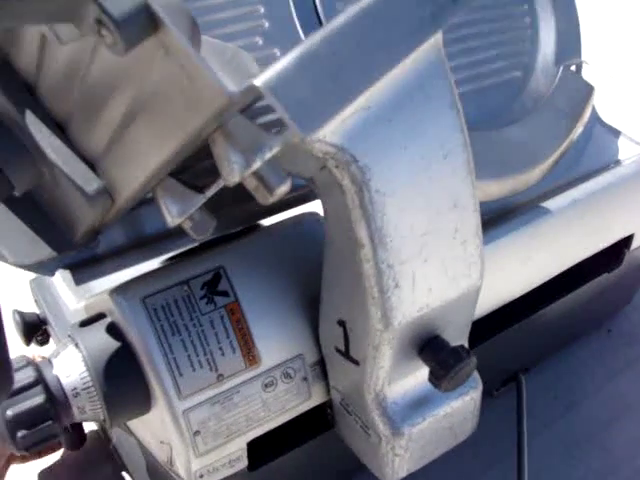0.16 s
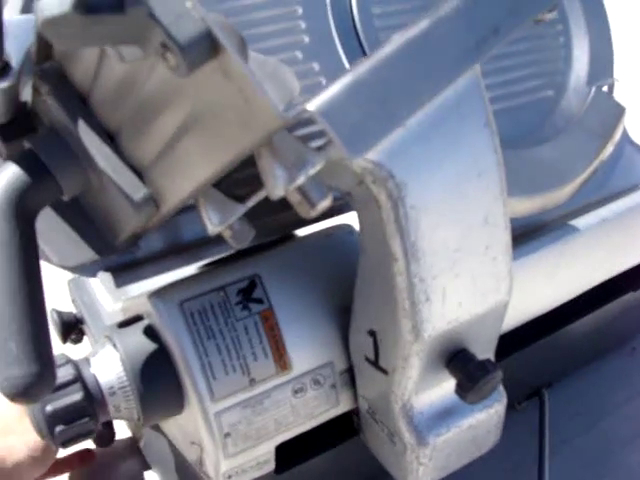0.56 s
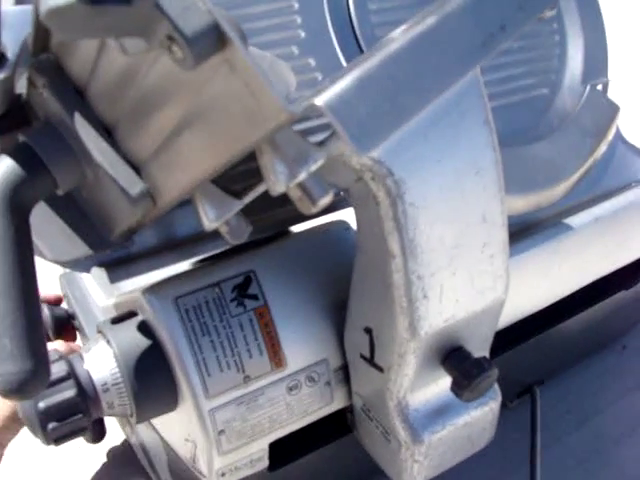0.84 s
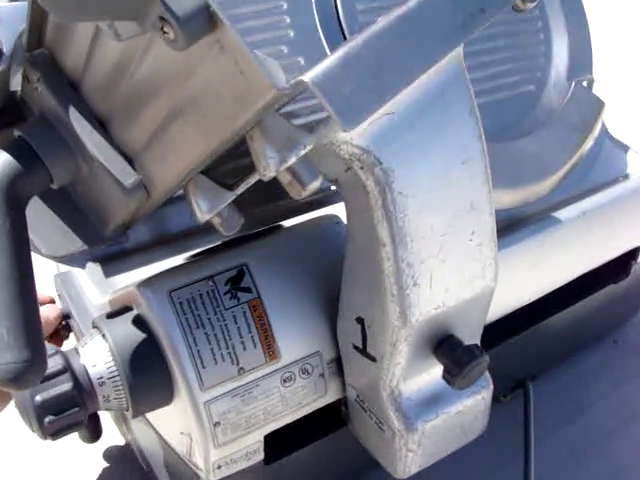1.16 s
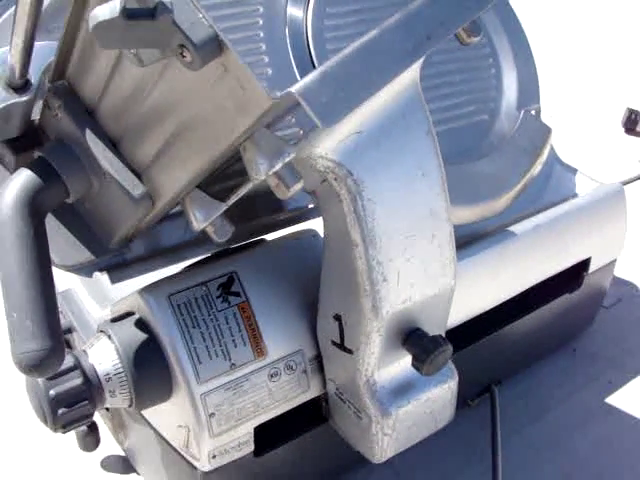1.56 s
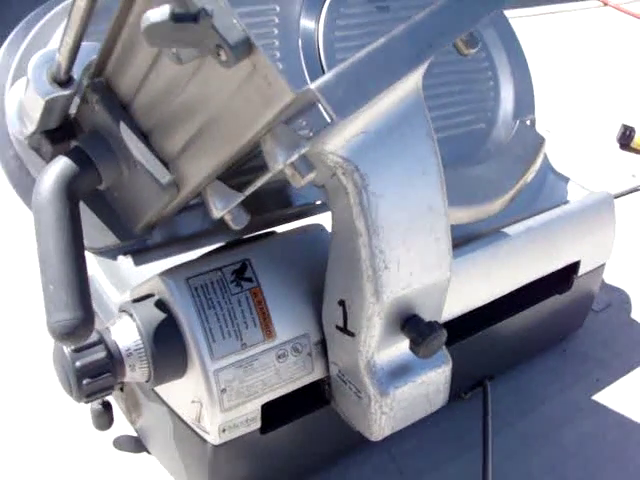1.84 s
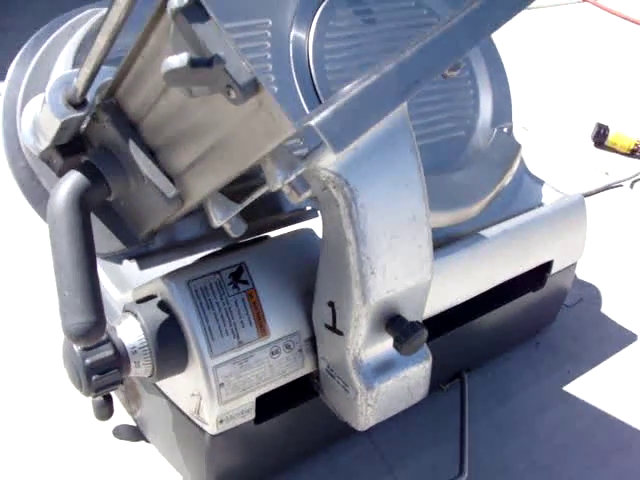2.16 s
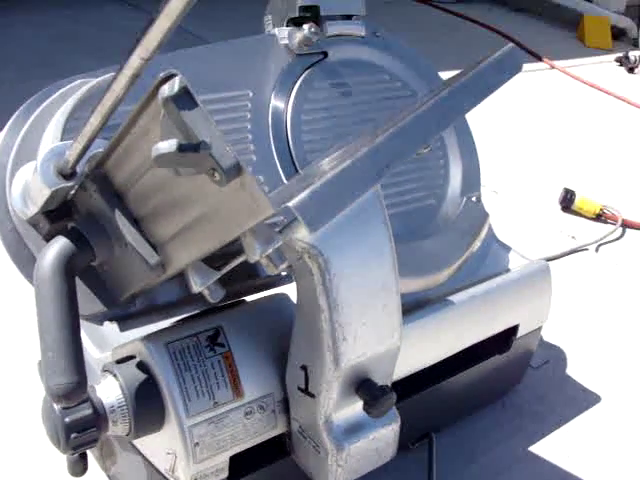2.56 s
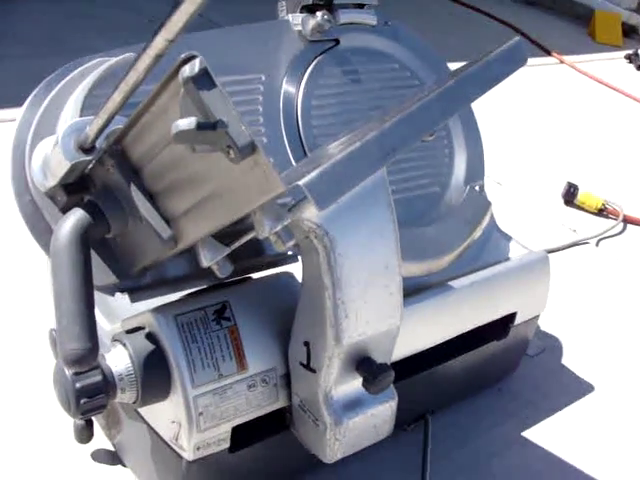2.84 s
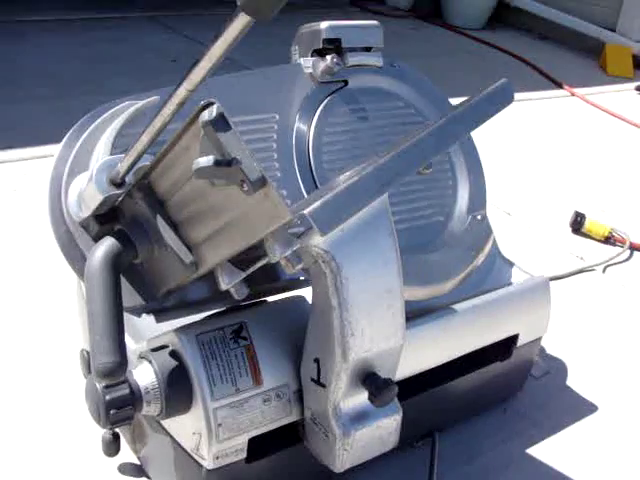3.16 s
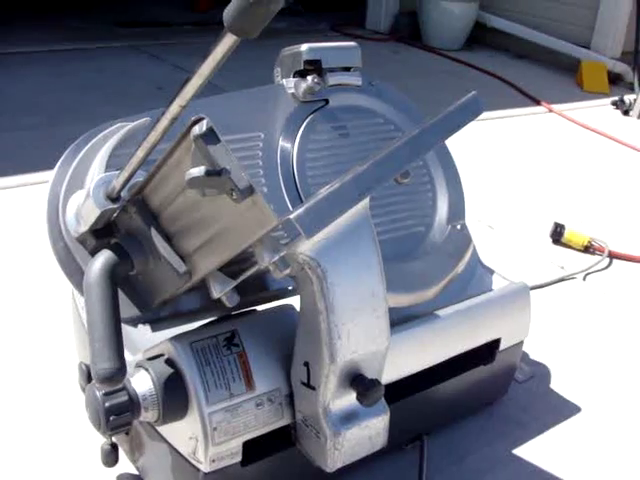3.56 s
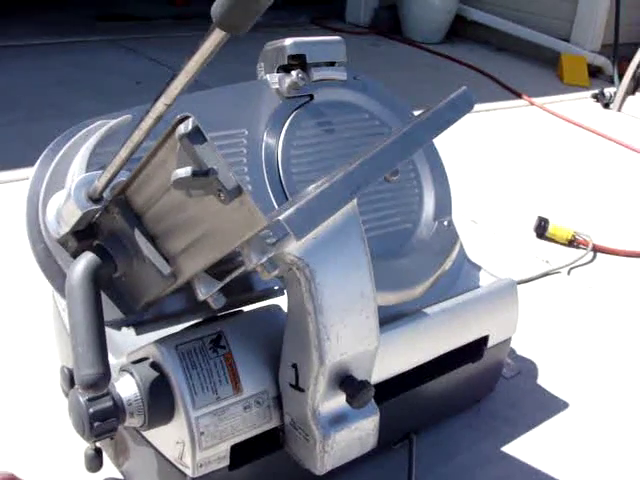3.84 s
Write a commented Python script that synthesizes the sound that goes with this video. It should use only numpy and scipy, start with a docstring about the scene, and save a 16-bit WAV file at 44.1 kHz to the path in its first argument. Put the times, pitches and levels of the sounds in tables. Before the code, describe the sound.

Close up in an open yard, fingers tap and rub a switch, a motor rattles into life and runs with hum, whir and regular gritty scrapes; a shoe scuffs paving midway, birds chirp at the end.

```python
"""A small electric slicer outdoors: air hushes as shaped noise, far birds chirp as gliding sines with a diffuse echo.
Fingers tap, bump and rub the switch, as decaying noise, low sines and noise bands; thin hisses come later.
The contact snaps, the motor clatters on through noise and ringing modes and settles to a mains hum, whines and whir;
then once a turn a stiff spot in the drive grinds, as grains that excite the housing's resonances.
Meanwhile a shoe scuffs the paving, as rough noise with rasping bands; near the end the birds chirp again."""
import sys
import numpy as np
from scipy import signal
from scipy.fft import rfft, irfft, next_fast_len
from scipy.io import wavfile
from scipy.ndimage import uniform_filter1d, map_coordinates

SR = 44100
rng = np.random.default_rng(int(sys.argv[2]) if len(sys.argv) > 2 else 0)


def linear_from_db(decibels):
    """Turn decibels (scalar or array-like) into linear amplitude factors; 0 gives 1."""
    return 10 ** (np.asarray(decibels, float) / 20)


def digitize_waveform(pressure):
    """Quantize a signal to 16-bit integers and store it at the path in sys.argv[1].

    Rows of a 2-D input are taken as channels; values are limited to [-1, 1].
    """
    field = np.atleast_2d(pressure).T
    bounded = np.clip(field, -1, 1)
    quanta = np.round(bounded * 32767).astype(np.int16)
    wavfile.write(sys.argv[1], SR, quanta)


N = 176400
T = np.arange(N) / SR  # seconds

# Spectrum of the outdoor hush. Each row: frequency in Hz, relative density in dB per Hz.
AIR_SPECTRUM = [(28, -11), (48, 0.5), (146, -0.5), (395, -7), (641, -1.5), (990, -12.5), (1210, -6),
                (1920, -6.5), (2680, -12.5), (3380, -11), (4140, -20.5), (5350, -16.5), (9870, -25),
                (12800, -54.5)]
AIR_DB = -45.5

# Gliding bird chirps. Each row: start in seconds, length in seconds, start pitch in Hz, end pitch in Hz,
# starting level in dB, hoarseness (scale of the random pitch deviation) in Hz.
CHIRPS = [(0.02, 0.025, 6000, 5660, -42, 100), (0.025, 0.063, 3330, 3480, -46, 131),
          (0.103, 0.031, 4930, 3600, -42, 100), (0.146, 0.05, 4930, 3320, -46.5, 180),
          (0.276, 0.12, 4880, 2240, -46.5, 130), (0.524, 0.03, 4460, 4870, -45.5, 298),
          (0.554, 0.093, 4040, 3380, -42, 200), (0.573, 0.079, 3160, 2980, -47, 120),
          (.675, 0.034, 2235, 2130, -46.5, 60), (3.808, 0.032, 4720, 4520, -43.5, 129.5),
          (3.806, 0.081, 4380, 4250, -42, 129.5), (3.85, 0.033, 3420, 3280, -33.5, 110)]
CHIRP_FADE_DB, CHIRP_ROUGH_DB = 3, 3.5  # fade along a chirp; scale of its random level
CHIRP_BEND = 0.8  # exponent; under 1 the glide flattens out
YARD_T60_S, YARD_DB = 0.4, -2.5  # decay and level of the yard echo

# Finger taps. Each row: start in seconds, level in dB before a common trim, 60 dB decay in seconds,
# treble relative to body in dB.
TAPS = [(0.74, -28, 0.063, -20), (0.893, -18.5, 0.095, -22), (0.978, -27, 0.057, -5.5)]
# Resonances of the switch plate. Each row: frequency in Hz, width in Hz, relative level in dB.
PLATE_MODES = [(866, 44, -1), (1490, 18, 4), (1990, 110, -7), (2840, 170, -8.5), (3420, 89, -1.5),
               (5900, 39, -13.5), (6400, 110, -12)]
# Soft low bumps. Each row: centre in seconds, frequency in Hz, length in seconds, level in dB before a common lift.
BUMPS = [(0.808, 62, 0.036, -39), (1.17, 353, 0.035, -48)]
# Finger rubs. Each row: start in seconds, rise in seconds, fall in seconds, level in dB, centre frequency in Hz.
RUBS = [(1.02, 0.026, 0.099, -41.5, 1580), (1.17, 0.011, .02, -45, 2900), (1.55, 0.036, 0.066, -34, 2000),
        (1.508, .004, .015, -40.5, 2200), (1.3, 0.0028, .016, -28, 1800)]
# Thin hisses. Each row: centre in seconds, length in seconds, level in dB.
HISSES = [(1.66, 0.085, -39), (1.805, 0.024, -36), (1.926, 0.038, -36.5), (2.668, 0.024, -41),
          (2.785, 0.04, -40), (2.925, 0.018, -40.5), (3.482, 0.027, -41)]
HISS_HZ, HISS_WIDTH_HZ = 6600, 3000

SNAP_S, SNAP_DB, SNAP_T60_S = 1.246, -18, 0.0062  # the contact snaps shut
# Course of the start-up rattle. Each row: time in seconds, treble level in dB, body level in dB.
CLATTER = [(1.243, -49.5, -46), (1.244, -18.5, -26), (1.246, -7.5, -19), (1.27, -18, -14),
           (1.281, -15, -17), (1.285, -18.5, -18), (1.287, -14.5, -8.5), (1.294, -26, -22.5),
           (1.32, -26, -18.5), (1.359, -25.5, -25.5), (1.385, -35, -29), (1.415, -43, -33),
           (1.435, -33, -42), (1.443, -35.5, -44), (1.452, -56.5, -50)]
# Spectrum of the rattle's body. Each row: frequency in Hz, relative density in dB per Hz.
CLATTER_BODY = [(120, -45), (200, -7.5), (921, -4.5), (1010, -8.5), (1180, -5), (1750, -3), (2540, -12.5),
                (2930, -1.5), (4300, -28), (5590, -34), (9460, -120)]
# Spectrum of the rattle's treble. Each row: frequency in Hz, relative density in dB per Hz.
CLATTER_TREBLE = [(2180, -14), (3700, -4.5), (4680, -12), (6210, -8), (7220, -7), (7940, -7), (9870, -17.5),
                  (12800, -55)]
# Housing modes shaken in turn. Each row: start in seconds, length in seconds, frequency in Hz,
# level in dB before a common lift.
SHAKES = [(1.254, 0.013, 1760, -21), (1.257, 0.032, 1010, -12), (1.277, 0.015, 2980, -11.5),
          (1.311, 0.037, 1800, -23), (1.338, 0.039, 785, -15.5), (1.358, 0.034, 974, -23),
          (1.356, .13, 137, -15), (1.381, 0.081, 230, -26)]

ON_S, HUM_RISE_S = 1.243, 0.09  # motor onset and rise
HUM_HZ, HUM_LAG_RAD = 120.01, 2.25
# Partials of the mains hum. Each row: multiple of the hum frequency, level in dB before a common lift.
HUM = [(1, -32), (2, -29), (3, -33)]
LOAD_DB = 1.5  # the hum swells as the stiff spot loads the motor
# Faint narrow whines. Each row: frequency in Hz, width in Hz, rms level in dB.
WHINES = [(145.5, 13, -48.5), (502, 17, -45.5), (603, 2.05, -42), (807, 60, -45.5), (843, 17, -44.5),
          (1664, 1.3, -47.5)]
# Spectrum of the motor's whir. Each row: frequency in Hz, relative density in dB per Hz.
WHIR_SPECTRUM = [(53, -47), (90, -19.5), (136, 1), (179, -9.5), (250, -4), (298, -10), (356, -3), (668, -9),
                 (797, -3.5), (915, -12.5), (1720, -12.5), (2590, -24), (3480, -32.5), (4590, -50.5),
                 (9870, -55.5), (12800, -79.5)]
# Course of the whir before trim. Each row: time in seconds, body level in dB, treble level in dB.
WHIR_LEVEL = [(1.45, -28, -48.5), (1.83, -33, -45.5), (2.15, -33.5, -46.5), (2.29, -31.5, -47.5),
              (3.03, -33.5, -49), (3.83, -34, -50), (4.0, -35.5, -49)]
WHIR_BUZZ = 0.12  # share of the whir that pulses with the hum

# Resonances of the metal housing. Each row: frequency in Hz, width in Hz, relative level in dB.
HOUSING_MODES = [(483, 11, 7.5), (762, 23.6, 2.5), (1003, 28, 1.5), (1298, 31, -6.5), (1443, 24, -10),
                 (1800, 15.7, -1.5), (2228, 19.3, -2.5), (2980, 37, -15.5), (3600, 65, -24.5)]
# Response of the housing between its modes. Each row: frequency in Hz, relative level in dB.
HOUSING_BROAD = [(200, -33.5), (420, 0), (700, 1.5), (1100, -9.5), (1900, -9), (2400, -10.5), (2650, -22.5),
                 (3500, -13), (4400, -40.5), (5200, -39.5), (12000, -78)]
BROAD_DB = -1
# Growth of the grind. Each row: time in seconds, gain in dB.
GRIND_GROWS = [(1.58, -8), (1.87, -1.5), (2.01, 1), (2.5, -0.5), (4, -0.5)]
TURN_S, FIRST_TURN_S = 0.1408, 1.584
GRIND_S, GRIND_DB = 0.018, -25.5  # time scale of one grind; overall gain
LATE_S, SCATTER_DB = 0.0021, 0.5  # random spread of timing and level from turn to turn
GRAINS_PER_S, GRAIN_BUZZ = 1800, 0.85  # mean rate; share of it that pulses with the hum
CATCH_S, BITE_S = 0.012, 0.002  # the spot bites this long before its peak, and this fast
BEFORE_CATCH = 0.5  # share of force before the bite
EVEN = 0.8  # 0-1: how alike each mode sounds from turn to turn
AFTER_S, AFTER_DB = 0.098, -16.5  # one mode flutters again later in the turn
LOW_HZ, LOW_LAG_S = 695, 0.01212  # the heavy base answers late below this frequency
GRIND_TOP_HZ = 4600  # the grind carries little above this

# Course of the shoe's scuff. Each row: time in seconds, level in dB.
SCUFF = [(2.14, -38), (2.24, -34.5), (2.329, -28.5), (2.42, -25), (2.46, -32), (2.54, -41.5)]
# Spectrum of the scuff. Each row: frequency in Hz, relative density in dB per Hz.
SCUFF_SPECTRUM = [(300, -35), (900, 2.5), (1500, -4), (2200, -5), (3200, -8), (5500, -14.5), (10000, -23.5),
                  (13000, -50)]
# Rasps inside the scuff. Each row: start in seconds, rise in seconds, fall in seconds, level in dB,
# centre frequency in Hz, width in Hz.
RASPS = [(2.2, .05, .06, -39, 3200, 600), (2.3, .05, .085, -28, 1530, 140),
         (2.37, .04, .04, -32, 1020, 120), (2.31, .04, .08, -42, 5600, 500)]


def unit(x):
    """Power normalisation: scale to rms 1."""
    return x / np.sqrt(np.mean(x ** 2) + 1e-20)


def along(points, hz):
    """Interpolation of (Hz, value) points on a logarithmic frequency axis."""
    f, value = np.transpose(points)
    return np.interp(np.log(hz + 1), np.log(f + 1), value)


def curves(rows):
    """Linear interpolation in time: one curve for each column after the time."""
    s, *columns = np.transpose(rows)
    return [np.interp(T, s, column) for column in columns]


def wobble(rate):
    """Smooth random fluctuation: a spline through normal draws, rate knots a second."""
    knots = rng.standard_normal(int(N * rate / SR) + 4)
    return map_coordinates(knots, [T * rate])


def filtered(x, response):
    """Linear filtering: multiply the spectrum by a complex response of frequency."""
    m = next_fast_len(N + 8192)
    return irfft(rfft(x, m) * response(np.fft.rfftfreq(m, 1 / SR)), m)[..., :N]


def modes(rows):
    """Modal superposition: causal resonances (Hz, width, dB) with alternating sign."""
    def response(f):
        return sum((-1) ** k * linear_from_db(db) * 1j * f * width / (c * c - f * f + 1j * f * width)
                   for k, (c, width, db) in enumerate(rows))
    return response


def noise(spectrum, patchy_db):
    """Coloured noise of rms 1, with random gain in patches of time and frequency."""
    z = signal.stft(rng.standard_normal(N + 512), nperseg=512)[2]
    patches = uniform_filter1d(rng.standard_normal(z.shape), 5, 0)
    patches = uniform_filter1d(patches, 8, 1)
    x = signal.istft(z * linear_from_db(patchy_db * unit(patches)), nperseg=512)[1][:N]
    return unit(filtered(x, lambda hz: linear_from_db(along(spectrum, hz))))


def band(hz, width_hz):
    """Resonance applied twice to white noise: a steep band of rms 1."""
    resonance = modes([(hz, width_hz, 0)])
    return unit(filtered(rng.standard_normal(N), lambda f: resonance(f) ** 2))


def hump(start, rise, fall):
    """Sine-squared envelope: a smooth swell and fade."""
    u = np.where(T < start + rise, (T - start) / rise, 1 - (T - start - rise) / fall)
    return np.sin(np.pi / 2 * np.clip(u, 0, 1)) ** 2


def held(start, length, edge):
    """Trapezoidal envelope: on for a length, with soft edges."""
    return np.clip(np.minimum(T - start, start + length - T) / edge, 0, 1)


def outdoor_air():
    """Broadband ambience: patchy coloured noise whose level drifts slowly."""
    return linear_from_db(AIR_DB + 0.39 * wobble(2.1)) * noise(AIR_SPECTRUM, 3.1)


def birds():
    """Frequency modulation makes hoarse gliding whistles; decaying noise gives a diffuse yard echo."""
    calls = np.zeros(N)
    for s, length, hz0, hz1, db, blur_hz in CHIRPS:
        done = np.clip((T - s) / length, 0, 1)
        hz = hz0 * (hz1 / hz0) ** done ** CHIRP_BEND + blur_hz * wobble(400)
        level = linear_from_db(db - CHIRP_FADE_DB * done + CHIRP_ROUGH_DB * wobble(150))
        calls += level * held(s, length, 0.0011) * np.sin(2 * np.pi * np.cumsum(hz) / SR)
    tail = rng.standard_normal(SR // 2) * linear_from_db(-60 * T[:SR // 2] / YARD_T60_S)
    tail = tail / np.linalg.norm(tail)
    return calls + linear_from_db(YARD_DB) * signal.fftconvolve(calls, tail)[:N]


def hands():
    """Impact and friction: decaying plate resonances, low sine bumps, rubbed bands and thin hisses."""
    plate = unit(filtered(rng.standard_normal(N), modes(PLATE_MODES))) + 0.29 * band(3260, 1500)
    treble = band(6000, 3500)
    taps = sum(linear_from_db(db - 7.0) * (T > s) * linear_from_db(-60 * np.abs(T - s) / t60) * (plate + linear_from_db(treble_db) * treble)
               for s, db, t60, treble_db in TAPS)
    bumps = sum(linear_from_db(db + 6.0) * hump(s - length / 2, length / 2, length / 2) * np.sin(2 * np.pi * hz * T)
                for s, hz, length, db in BUMPS)
    rubs = sum(linear_from_db(db + 3.4 * wobble(60)) * hump(s, rise, fall) * band(hz, 0.71 * hz)
               for s, rise, fall, db, hz in RUBS)
    hiss_level = sum(linear_from_db(db) * hump(s - length / 2, length / 2, length / 2) for s, length, db in HISSES)
    return taps + bumps + rubs + hiss_level * band(HISS_HZ, HISS_WIDTH_HZ)


def start_up():
    """Transient excitation: a snap, a rough rattle and flaring housing modes, the lower wavering slower."""
    treble_db, body_db = curves(CLATTER)
    start, end = CLATTER[0][0], CLATTER[-1][0]
    rough = linear_from_db(2.2 * wobble(400)) * held(start, end - start, 0.002)
    ringing = unit(filtered(rng.standard_normal(N), modes(HOUSING_MODES)))
    body = noise(CLATTER_BODY, 2.2) + 0.22 * ringing
    rattle = rough * (linear_from_db(treble_db) * noise(CLATTER_TREBLE, 1.4) + linear_from_db(body_db) * body)
    snap = linear_from_db(SNAP_DB - 60 * np.abs(T - SNAP_S) / SNAP_T60_S) * (T > SNAP_S) * band(5000, 9000)
    shakes = sum(linear_from_db(db + 2.5 + 2.4 * wobble(hz / 4)) * np.sqrt(hump(s, length / 3, length * 2 / 3))
                 * np.sin(2 * np.pi * hz * T + 0.86 * wobble(hz / 8))
                 for s, length, hz, db in SHAKES)
    # high-pass near 72 Hz
    return filtered(rattle + snap + shakes, lambda hz: 1 / (1 + (72 / (hz + 1)) ** 6))


def motor():
    """Periodic forcing: mains hum harmonics, faint whines and a whir partly modulated by the hum."""
    on = np.clip((T - ON_S) / HUM_RISE_S, 0, 1)
    phase = 2 * np.pi * HUM_HZ * T
    load_db = LOAD_DB * np.cos(2 * np.pi * (T - FIRST_TURN_S) / TURN_S)
    hum = sum(linear_from_db(db + 2.5 + load_db + 0.34 * wobble(7.2))
              * np.cos(k * phase - HUM_LAG_RAD + 0.072 * wobble(1.4)) for k, db in HUM)
    whines = sum(linear_from_db(db) * band(hz, width) for hz, width, db in WHINES)
    body_db, treble_db = curves(WHIR_LEVEL)
    whir = noise(WHIR_SPECTRUM, 1.3)
    whir = whir + WHIR_BUZZ * np.cos(phase - 0.6) * filtered(whir, lambda hz: hz > 400)
    body = filtered(whir, lambda hz: 1 / (1 + (hz / 4200) ** 8))
    treble = unit(whir - body)
    # the body's level is set by its rms above 400 Hz
    body_rms = np.sqrt(np.mean(filtered(body, lambda hz: hz > 400) ** 2))
    return on * (hum + whines + linear_from_db(body_db - 0.5) * body / body_rms + linear_from_db(treble_db + 1.2) * treble)


def grind():
    """Stick-slip grains excite the housing modes once a turn, each mode about equally every time."""
    turn = np.clip(np.round((T - FIRST_TURN_S) / TURN_S).astype(int), 0, None)
    force, late = rng.standard_normal((turn[-1] + 1, 2))[turn].T
    t = T - FIRST_TURN_S - TURN_S * turn - LATE_S * late  # seconds from this turn's peak
    u = t / GRIND_S
    bite = np.interp(t, [-CATCH_S, BITE_S - CATCH_S], [BEFORE_CATCH, 1])
    swell = bite * np.exp(-np.where(u < 0, np.abs(u) ** 3, 0.52 * u ** 2))

    chance = GRAINS_PER_S / SR * (1 + GRAIN_BUZZ * np.cos(2 * np.pi * HUM_HZ * T))
    grains = (rng.random(N) < chance) * rng.standard_normal(N) + 0.1 * rng.standard_normal(N)
    rings = np.array([filtered(grains, modes([row])) for row in HOUSING_MODES])
    broad = unit(filtered(grains, lambda f: linear_from_db(along(HOUSING_BROAD, f))))
    parts = [*(rings / np.sqrt(np.mean(rings ** 2) * len(rings))), linear_from_db(BROAD_DB) * broad]

    def turn_energy(x):
        """Energy summed over each turn, held through that turn."""
        return np.bincount(turn, x ** 2)[turn] + 1e-12

    out = 0
    for part in parts:
        evening = np.mean(part ** 2) * turn_energy(swell) / turn_energy(swell * part)
        out = out + swell * part * evening ** (EVEN / 2)
    after = np.exp(-((t % TURN_S - AFTER_S) / GRIND_S) ** 2) * (T > FIRST_TURN_S) * unit(rings[1])

    def base_lag(f):
        """Phase delay of the lows, with a low-pass."""
        return np.exp(-2j * np.pi * f * LOW_LAG_S * (f < LOW_HZ)) / (1 + (f / GRIND_TOP_HZ) ** 10)

    gain = linear_from_db(curves(GRIND_GROWS)[0] + GRIND_DB)
    return filtered((out * linear_from_db(SCATTER_DB * force) + linear_from_db(AFTER_DB) * after) * gain, base_lag)


def shoe():
    """Sliding friction: one gritty scuff of coloured noise with narrower rasps in it."""
    start, end = SCUFF[0][0], SCUFF[-1][0]
    level = held(start, end - start, 0.064) * linear_from_db(curves(SCUFF)[0])
    rasps = sum(linear_from_db(db) * hump(s, rise, fall) * band(hz, width) for s, rise, fall, db, hz, width in RASPS)
    return linear_from_db(1.8 * wobble(90)) * (level * noise(SCUFF_SPECTRUM, 1.3) + rasps)


def scene():
    """Superposition: every source sums at one microphone."""
    return (outdoor_air() + birds() + hands() + start_up() + motor() + grind() + shoe())[None]


def top_cut(x):
    """Nothing passes above the cut-off."""
    return signal.sosfilt(signal.butter(12, 10020, fs=SR, output="sos"), x)


def record(dry):
    """Saturation: soft clipping bends peaks smoothly toward full scale."""
    mix = dry / (1 + np.abs(dry) ** 6) ** (1 / 6)
    return top_cut(mix)


dry = scene()
out = record(dry)
digitize_waveform(out)
```